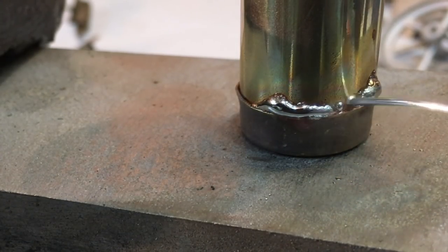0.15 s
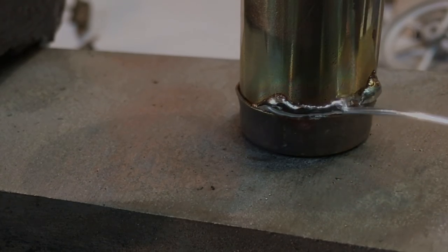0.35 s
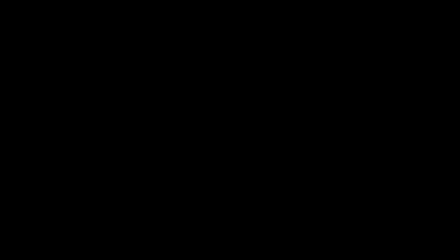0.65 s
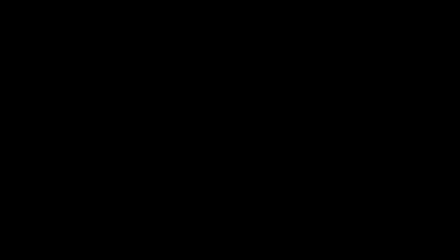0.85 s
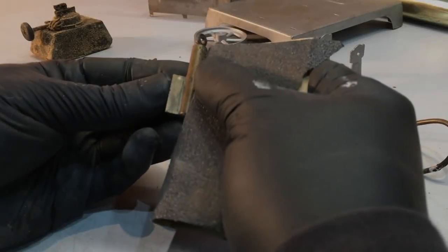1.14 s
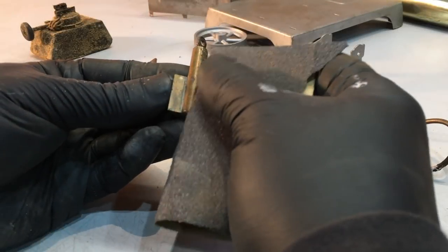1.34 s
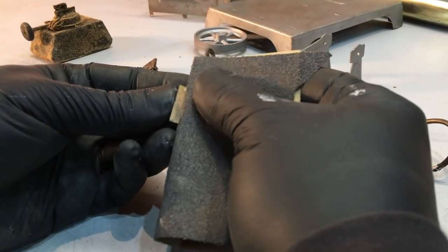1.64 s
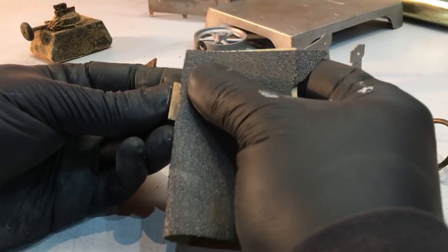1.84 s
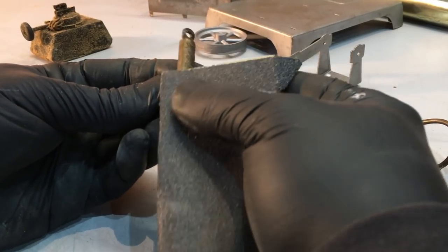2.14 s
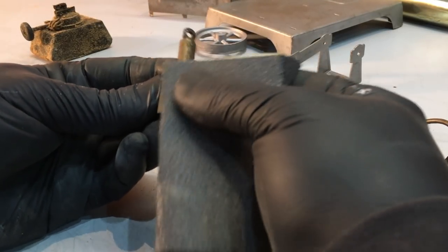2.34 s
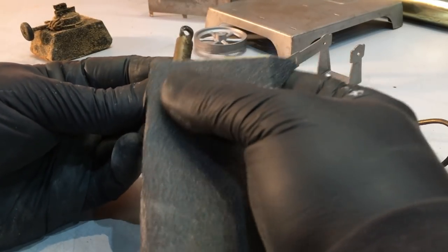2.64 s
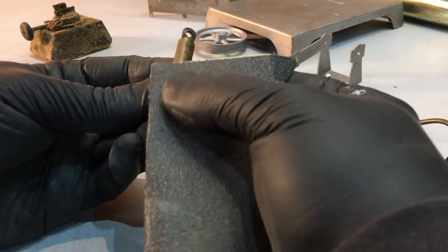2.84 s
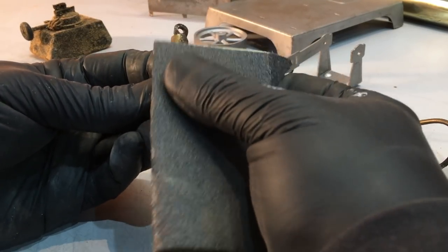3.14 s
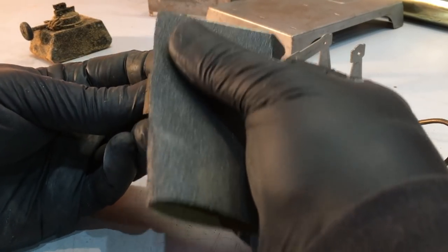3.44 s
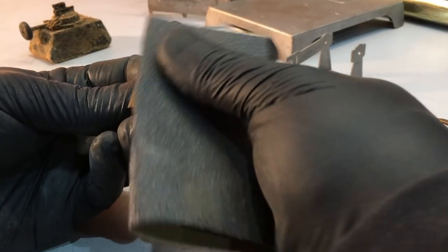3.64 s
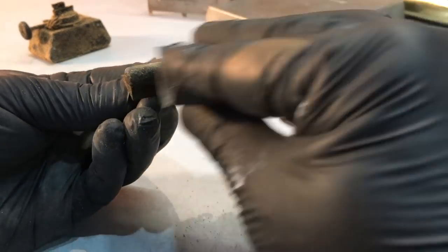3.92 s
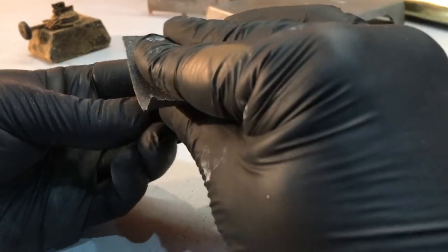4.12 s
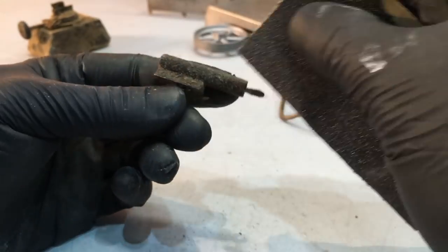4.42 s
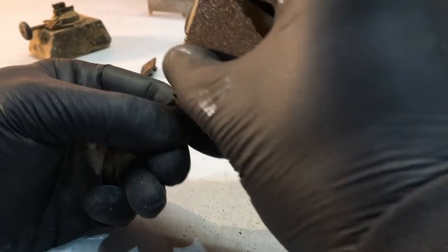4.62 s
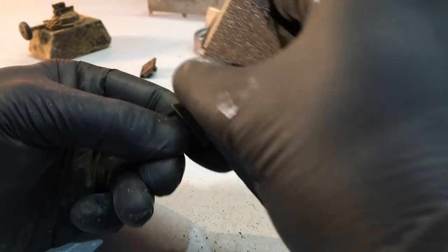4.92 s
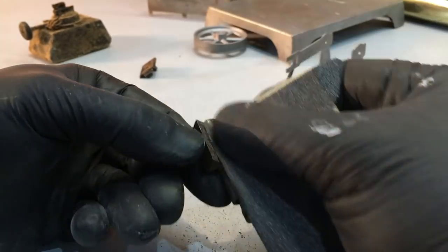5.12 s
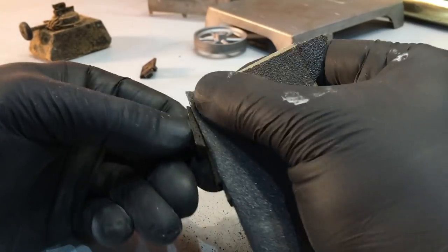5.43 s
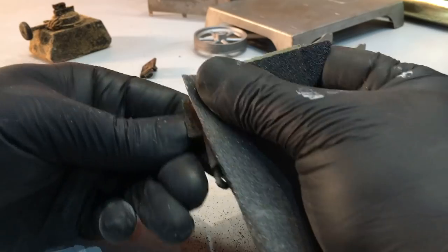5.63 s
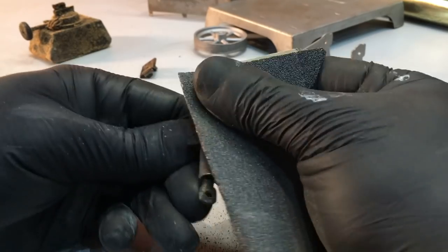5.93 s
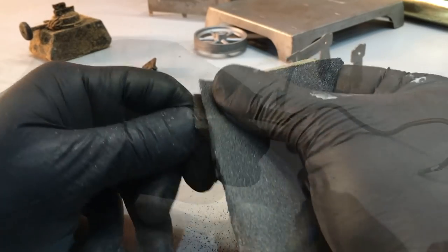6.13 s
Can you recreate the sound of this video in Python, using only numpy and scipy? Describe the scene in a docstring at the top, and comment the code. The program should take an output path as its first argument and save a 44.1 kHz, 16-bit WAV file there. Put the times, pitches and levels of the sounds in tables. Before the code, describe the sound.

A nearly silent opening holds tiny spits and a delicate sizzle of soldering flux over a faint low drone. About a second in, abrasive paper begins rasping on a small metal piece, around nine strokes a second, with crisp cracks on the edge. It then becomes rapid, lighter scrubbing with changing tone as the grip shifts. Close and dry, with hardly any reverberation.

```python
"""At a workbench, flux on a solder joint spits, then simmers with a fine fizz and boils up in short surges; a soft
drone swells once. The paper ticks twice as it is handled. Gloved hands then rub abrasive paper over a small brass
part: single strokes, some with sharp snaps of coarse grains on an edge, then quick short scrubbing. Randomly struck
grains ring the paper and the part through band resonances that change with each grip. Soft bumps, a short diffuse
tail and steady room tone lie beneath."""
import sys
import numpy as np
from scipy import signal
from scipy.fft import rfft, irfft
from scipy.io import wavfile

SR = 44100
rng = np.random.default_rng(int(sys.argv[2]) if len(sys.argv) > 2 else 0)


def wrap_up_sound(samples):
    """Save the sound to the file named by the first command line argument, as 16-bit audio."""
    columns = np.atleast_2d(samples).T
    # keep every value between -1 and 1, then stretch to whole-number steps
    tamed = np.clip(columns, -1, 1)
    steps = np.round(tamed * 32767).astype(np.int16)
    wavfile.write(sys.argv[1], SR, steps)


N = 276507
TIME_S = np.arange(N) / SR
BODY_BELOW_HZ, HISS_ABOVE_HZ = 2400, 7500


def from_db(db):
    """Decibels to gain."""
    return 10 ** (np.asarray(db) / 20)


def rms_one(x):
    """Scale to unit power."""
    return x / np.sqrt(np.mean(x ** 2) + 1e-20)


def flicker(size, rate_hz):
    """Smooth random curve of rms 1 that changes about rate_hz times a second."""
    points = rng.standard_normal(size)
    return rms_one(np.interp(np.arange(size) * rate_hz / SR, np.arange(size), points))


def coloured(x, spectrum):
    """Give x a smooth spectrum, interpolated over log frequency; rms 1."""
    hz, db = np.transpose(spectrum)
    bins_hz = np.maximum(np.fft.rfftfreq(N, 1 / SR), 1)
    gain = from_db(np.interp(np.log(bins_hz), np.log(hz), db))
    return rms_one(irfft(rfft(x) * gain, N))


def resonate(x, hz, width_hz):
    """A damped cluster of modes around hz, as a band filter."""
    edges_hz = np.clip([hz - width_hz / 2, hz + width_hz / 2], 30, .47 * SR)
    band = signal.butter(2, edges_hz, "band", fs=SR, output="sos")
    return signal.sosfilt(band, x + 1e-18)


def crack(decay_s):
    """A tiny fracture: a noise burst that dies at once."""
    age_s = np.arange(SR // 20) / SR
    return rng.standard_normal(len(age_s)) * np.exp(-age_s / decay_s)


def add(out, start_s, sound):
    """Mix a sound in at start_s."""
    at = max(round(start_s * SR), 0)
    out[at:at + len(sound)] += sound[:max(N - at, 0)]


# light or dull strokes have more body: dB of body lost per dB of level and per dB of fine hiss
USUAL_LEVEL_DB, BODY_LOSS_PER_LEVEL, BODY_LOSS_PER_HISS = -40, 0.28, 0.44


def sanding(bite=1.0, release=1.29, colour_db=1.65, creep_db=-27, linger=1.5, wander=0.029):
    """In each stroke the hand speeds up and stops again; every grain hits each resonance with its own strength."""
    out = np.zeros(N)
    for start_s, end_s, level_db, fastest, body_db, hiss_db in hand_strokes():
        body_db = body_db - BODY_LOSS_PER_LEVEL * (level_db - USUAL_LEVEL_DB)
        body_db = body_db - BODY_LOSS_PER_HISS * hiss_db
        length_s = max(end_s - start_s, .01)
        progress = np.arange(SR // 5) / SR / length_s
        turn = np.interp(progress, [0, np.clip(fastest, .05, .95), 1], [0, 1, 0])
        # quick bite, gentler release
        speed = np.sin(turn * np.pi / 2) ** np.where(progress < fastest, bite, release)
        # the paper keeps creeping while the hand turns round
        speed = np.maximum(speed, from_db(creep_db) * (progress < linger))
        force = from_db(level_db) * grit(speed)
        add(out, start_s, from_db(level_db + hiss_db) * splinters(speed))
        for hz, width_hz, gain in grip_at((start_s + end_s) / 2):
            # the contact point wanders from stroke to stroke and recolours the sound
            mode_db = body_db * (hz < BODY_BELOW_HZ) + hiss_db * (hz > HISS_ABOVE_HZ)
            mode_db = mode_db + colour_db * rng.normal()
            centre_hz = hz * np.exp(wander * rng.normal())
            strikes = force * rng.standard_normal(len(force))
            add(out, start_s, gain * from_db(mode_db) * resonate(strikes, centre_hz, width_hz))
    return out


# Single strokes. Each row: start in seconds, end in seconds, level in dB, fine hiss in dB, direction.
STROKES = [(1.037, 1.12, -50.5, -3.5, "pull"), (1.124, 1.267, -39, -13, "push"),
           (1.263, 1.325, -50, -4, "push"), (1.357, 1.452, -53.5, -5, "push"),
           (1.427, 1.478, -47, -7.5, "pull"), (1.506, 1.625, -43.5, -3, "push"),
           (1.632, 1.725, -42, 1, "pull"), (1.747, 1.859, -37, -3, "push"), (1.862, 1.952, -36, 0, "push"),
           (1.963, 2.074, -32, -5, "pull"), (2.087, 2.176, -27, -8, "push"),
           (2.184, 2.289, -29.5, -4, "pull"), (2.318, 2.407, -28.5, -2, "push"),
           (2.41, 2.522, -26, -5, "pull"), (2.534, 2.631, -26, -4.5, "push"),
           (2.637, 2.743, -25, -11, "push"), (2.761, 2.842, -35, 1.5, "push"),
           (2.851, 2.967, -34.5, -2, "pull"), (2.998, 3.109, -37, 3, "push"),
           (3.111, 3.227, -32.5, -2, "pull"), (3.257, 3.363, -33.5, 1, "push"),
           (3.373, 3.502, -32, -3, "push"), (3.515, 3.62, -32, -1.5, "push"),
           (3.634, 3.68, -29.5, -2, "pull"), (3.856, 3.896, -33, -3.5, "pull")]
# A push is fastest early and thin, a pull late and full.
# Each direction: fastest moment as share of the stroke (0-1), body in dB.
DIRECTIONS = {"push": (0.34, -0.24), "pull": (0.63, 0.59)}
# Bursts of even back-and-forth scrubbing; strokes overlap where the paper does not come to rest.
# Each row: start in seconds, end in seconds, number of strokes, first level in dB, last level in dB,
# fine hiss in dB, overlap in seconds.
SCRUBS = [(3.678, 3.856, 7, -39.5, -37, 2.5, 0.0041), (3.961, 4.149, 8, -42.5, -42.5, 0, 0.0077),
          (4.235, 4.459, 9, -41, -41.5, .5, 0.0051), (4.529, 4.587, 2, -55, -70, 6, 0.0032),
          (4.596, 4.873, 7, -45.5, -38, -2, .002), (4.873, 5.021, 4, -40, -42, -1, 0.0022),
          (5.02, 5.158, 4, -44, -47, 3.5, 0.0028), (5.16, 5.323, 5, -36.5, -34, -3, 0.0027),
          (5.326, 5.469, 4, -34, -36, -2, 0.0021), (5.467, 5.776, 9, -35, -35.5, -1.5, 0.0027),
          (5.778, 5.865, 3, -37.5, -40, -2, 0.0032), (5.892, 6.066, 5, -39.5, -40, 0.5, .003),
          (6.073, 6.269, 6, -39, -41.5, 1.5, 0.0047)]
SCRUB_FASTEST = .47   # share of a scrubbing stroke
SCRUB_JITTER_S, SCRUB_UNEVEN_DB = .001, 1.0


def hand_strokes():
    """Every stroke: start in s, end in s, level in dB, fastest moment as share, body in dB, fine hiss in dB."""
    for start_s, end_s, level_db, hiss_db, direction in STROKES:
        fastest, body_db = DIRECTIONS[direction]
        yield start_s, end_s, level_db, fastest, body_db, hiss_db
    for start_s, end_s, strokes, first_db, last_db, hiss_db, overlap_s in SCRUBS:
        count = round(strokes)
        turns_s = np.linspace(start_s, end_s, count + 1)
        turns_s = turns_s + SCRUB_JITTER_S * rng.standard_normal(count + 1)
        levels_db = np.linspace(first_db, last_db, count)
        levels_db = levels_db + SCRUB_UNEVEN_DB * rng.standard_normal(count)
        for turn_s, next_s, level_db in zip(turns_s, turns_s[1:], levels_db):
            yield turn_s - overlap_s, next_s + overlap_s, level_db, SCRUB_FASTEST, 0, hiss_db


def grit(speed, grains_per_s=14000, grain_spread_db=3.0, chatter_db=1.0, chatter_hz=520,
         pressure_db=2.14, pressure_hz=110):
    """Force of the grains: they strike more often at speed, in clumps as the paper sticks and slips."""
    size = len(speed)
    struck = rng.random(size) < grains_per_s * np.sqrt(speed) / SR
    grain_db = grain_spread_db * np.minimum(rng.exponential(1, size), 6)
    clump_db = chatter_db * flicker(size, chatter_hz) + pressure_db * flicker(size, pressure_hz)
    force = speed * struck * from_db(grain_db + clump_db)
    return rms_one(force) * np.sqrt(np.mean(speed ** 2))


def splinters(speed, per_s=45, tick_db=5.0, decay_s=0.00026):
    """Now and then a grain breaks off with a bright tick, even when the paper barely moves."""
    broken = rng.random(len(speed)) < per_s / SR
    breaks = broken * rng.exponential(1, len(speed)) * np.sqrt(speed)
    ticks = signal.fftconvolve(breaks, crack(decay_s))[:len(speed)]
    bright = signal.butter(1, HISS_ABOVE_HZ, "high", fs=SR, output="sos")
    return from_db(tick_db) * signal.sosfilt(bright, ticks)


# Resonances of paper, part and cupped hand in each grip. Each row: centre in Hz, width in Hz, level in dB.
LOOSE = [(1330, 790, -14.5), (2010, 230, -12.5), (3280, 790, -4), (5160, 6700, -16.5), (5710, 1310.0, -2),
         (8630, 1800, -6), (12300, 2200, -2), (14200, 1900, -4.5)]
FIRM = [(1344, 950, -10), (1960, 59, -12.5), (3135, 620, 0), (4310, 710, -5.5), (5680, 1130, 0.5),
        (8300, 6200, -1), (11030, 340, 2.5), (12700, 4500, -3.5)]
THUMB_FLAT = [(1290, 600, -13), (1945, 160, -11), (3300, 800, -0.5), (4300, 880, -9.5), (5850, 1300, -4),
              (8730, 1860, -4.5), (11890.0, 2200, -8), (14700, 920, -10.5)]
THUMB_SCRUB = [(1200, 410, -13), (2020, 440, -13.5), (3220, 820, 4), (3900, 180, -4), (6100, 2400, -6),
               (9200, 950, -2), (12300, 3000, -8.5)]
PART_END = [(1370, 810, -15), (1960, 250, -7), (3320, 890, -5.5), (4200, 3160, -7.5), (6180, 1500, -3),
            (9100, 1300, -5), (11780.0, 1800, -9.5), (14000, 2400, -11.5)]
PINCHED = [(294, 240, -10), (670, 150, -2), (1280, 750, -6.5), (2120, 400, 0), (3040, 1040, -4.5),
           (5700, 3600, -2), (12100, 5700, -3)]
PART_EDGE = [(1270, 460, -8.5), (1930, 620, -8.5), (3230, 1150, -3.5), (4330, 500, -12), (5680, 1930, -2),
             (8670, 1900, -0.5), (11730, 1300, 0), (14100, 1600, -4)]
PART_FACE = [(1400, 770, -12.5), (2320, 890, -11.5), (3360, 870, -0.9), (6130, 2000, -3), (10000, 5600, -8)]
# Succession of grips. Each row: held until in seconds, resonances.
GRIPS = [(1.955, LOOSE), (2.75, FIRM), (3.625, THUMB_FLAT), (3.92, THUMB_SCRUB), (4.588, PART_END),
         (5.156, PINCHED), (5.878, PART_EDGE), (np.inf, PART_FACE)]
# Low resonances common to all grips.
# Each row: centre in Hz, width in Hz, level in dB relative to the grip's lowest resonance.
HOLLOW = [(676, 160, -4), (460, 545, -14)]


def grip_at(time_s):
    """Resonances (Hz, width in Hz, gain) of the grip held at time_s, scaled to unit power in all."""
    own = next(modes for until_s, modes in GRIPS if time_s < until_s)
    lowest_db = own[0][2]
    hollow = [(hz, width_hz, db + lowest_db) for hz, width_hz, db in HOLLOW]
    hz, width_hz, db = np.transpose(hollow + list(own))
    gain = from_db(db)
    power = np.sum(gain ** 2 * width_hz) * 2 / SR
    return zip(hz, width_hz, gain / np.sqrt(power))


# Sharp snaps: two ticks of the paper being handled, then coarse grains catching on an edge.
# Each row: time in seconds, peak in dB, fine hiss in dB.
SNAGS = [(0.8827, -41, -5), (0.912, -49, -14), (1.091, -35, 2), (1.169, -25, 0), (1.3325, -34, -9),
         (1.526, -31, -14.5), (1.7752, -18, 21), (2.0501, -18.5, 19), (2.114, -14.5, 11), (2.324, -21, 21),
         (2.579, -11.5, 6), (3.0073, -25.5, 7)]


def snags(decay_s=0.0015):
    """Handling ticks the paper twice, then coarse grains catch and let go: cracks through the grip's resonances."""
    out = np.zeros(N)
    for time_s, peak_db, hiss_db in SNAGS:
        snap = 0
        for hz, width_hz, gain in grip_at(time_s):
            mode_gain = gain * from_db(hiss_db * (hz > HISS_ABOVE_HZ))
            snap = snap + mode_gain * resonate(crack(decay_s), hz, width_hz)
        add(out, time_s, from_db(peak_db) * snap / np.abs(snap).max())
    return out


# Spectrum of the fizz. Each row: frequency in Hz, density in dB per Hz.
FLUX = [(350, -19), (700, -11), (1600, -10.5), (3300, -1), (7500, -7), (15500, -11)]
# Larger bubbles spitting. Each row: time in seconds, peak in dB.
SPITS = [(0.0178, -44), (0.1815, -47), (0.2, -50), (.392, -49), (0.98, -37)]
# Simmering between the surges, then cooling. Each row: time in seconds, level in dB.
SIMMER = [(.305, -97), (.319, -61.5), (.7, -65), (1.05, -65), (1.2, -67)]
# Boiling up as solder is fed in. Each row: start in seconds, length in seconds, level in dB.
SURGES = [(0.307, 0.038, -55), (0.482, 0.12, -51), (0.551, 0.022, -53), (0.605, 0.048, -51.5),
          (0.637, 0.077, -53.5), (0.714, 0.09, -56.5)]
SURGE_RISE = 0.38   # share of a surge's length
CRACKLE_PER_S, CRACKLE_DB = 35, 5   # small bubbles bursting at random; dB over the simmer


def flux(spit_hz=9000, spit_decay_s=0.00059, sputter_db=2.7):
    """Flux simmers in a fine, crackling fizz and boils up in surges; now and then a larger bubble spits."""
    fizz = rng.standard_normal(N) * from_db(sputter_db * flicker(N, 250))
    simmer = from_db(np.interp(TIME_S, *np.transpose(SIMMER)))
    boil = simmer
    for start_s, length_s, db in SURGES:
        surge = np.interp((TIME_S - start_s) / length_s, [0, SURGE_RISE, 1], [0, 1, 0])
        boil = np.hypot(boil, from_db(db) * surge)
    bursts = (rng.random(N) < CRACKLE_PER_S / SR) * rng.random(N) * simmer
    pops = signal.fftconvolve(bursts, crack(spit_decay_s))[:N]
    crackle = resonate(pops, spit_hz, width_hz=spit_hz)
    out = coloured(fizz, FLUX) * boil + from_db(CRACKLE_DB) * crackle
    for time_s, peak_db in SPITS:
        spit = resonate(crack(spit_decay_s), spit_hz, width_hz=spit_hz)
        add(out, time_s, from_db(peak_db) * spit / np.abs(spit).max())
    return out


# Hands bumping softly on the bench. Each row: time in seconds, level in dB.
BUMPS = [(.52, -60), (1.948, -66), (3.049, -55.5), (3.352, -59), (3.58, -62.5), (3.971, -65), (5.821, -57),
         (6.0, -65)]
# Faint rumble of the working hands. The row: from in seconds, centre in Hz, width in Hz, level in dB.
HANDLING = (1.1, 67, 61, -76.5)


def bumps(thud_hz=62, width_hz=55, rise_s=0.019, uneven_db=3):
    """Gloved hands give an uneven rumble and dull, cushioned thuds that swell and die away."""
    since_s, rumble_hz, rumble_width_hz, rumble_db = HANDLING
    rumble = resonate(rng.standard_normal(N), rumble_hz, rumble_width_hz)
    rumble = rms_one(rumble * from_db(uneven_db * flicker(N, 18)))
    out = from_db(rumble_db) * rumble * np.clip((TIME_S - since_s) / rise_s, 0, 1)
    age = np.arange(SR // 3) / SR / rise_s   # in rise times
    for time_s, db in BUMPS:
        thud = rms_one(resonate(rng.standard_normal(len(age)), thud_hz, width_hz))
        add(out, time_s, from_db(db) * thud * age * np.exp(1 - age))
    return out


ROOM_T60_S, ROOM_DB = 0.12, -25


def workshop(x):
    """A weak, dull, diffuse tail from the bench and walls: decaying noise convolved with the sound."""
    age_s = np.arange(SR // 2) / SR
    tail = rng.standard_normal(len(age_s)) * from_db(-60 * age_s / ROOM_T60_S)
    tail = signal.sosfilt(signal.butter(1, HISS_ABOVE_HZ, fs=SR, output="sos"), tail)
    return x + from_db(ROOM_DB) * signal.fftconvolve(x, tail / np.linalg.norm(tail))[:N]


# Spectrum of the room tone. Each row: frequency in Hz, density in dB per Hz.
AIR = [(12, -9), (42, 1.5), (80, -11), (140, -13.5), (450, -25.5), (12000, -33.5)]
AIR_DB = -68.5
# A soft low drone swells once. The row: middle in seconds, length in seconds, centre in Hz, level in dB.
DRONE = (0.8, 1.5, 266, -74.5)
DRONE_WIDTH_HZ = 57


def room_tone(hum_hz=94.4, hum_db=-81):
    """Low rumble and faint hiss as shaped noise, a steady sine hum and a narrow-band drone that swells once."""
    air = from_db(AIR_DB) * coloured(rng.standard_normal(N), AIR)
    middle_s, length_s, drone_hz, drone_db = DRONE
    swell = np.cos(np.pi * np.clip((TIME_S - middle_s) / length_s, -.5, .5)) ** 2
    drone = rms_one(resonate(rng.standard_normal(N), drone_hz, DRONE_WIDTH_HZ))
    hum = rms_one(np.sin(2 * np.pi * hum_hz * TIME_S))
    return air + from_db(drone_db) * swell * drone + from_db(hum_db) * hum


def scene():
    """Hand work and flux with the workshop's tail, over bumps and room tone; one channel."""
    close_work = sanding() + snags() + flux()
    return (workshop(close_work) + bumps() + room_tone())[None]


CUTOFF_HZ = 16100


def record(dry):
    """The top is cut steeply by an elliptic low-pass."""
    return signal.sosfilt(signal.ellip(12, .1, 80, CUTOFF_HZ, fs=SR, output="sos"), dry)


dry = scene()
out = record(dry)
wrap_up_sound(out)
```